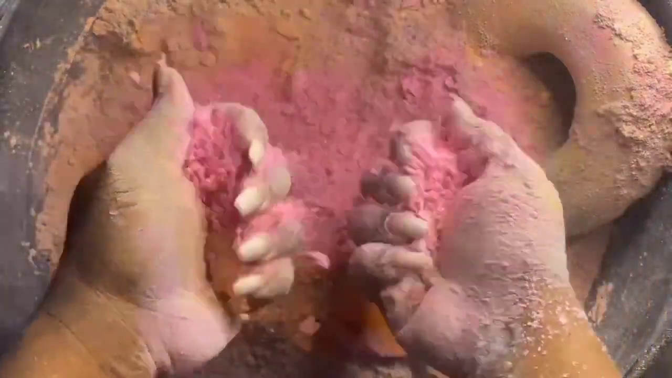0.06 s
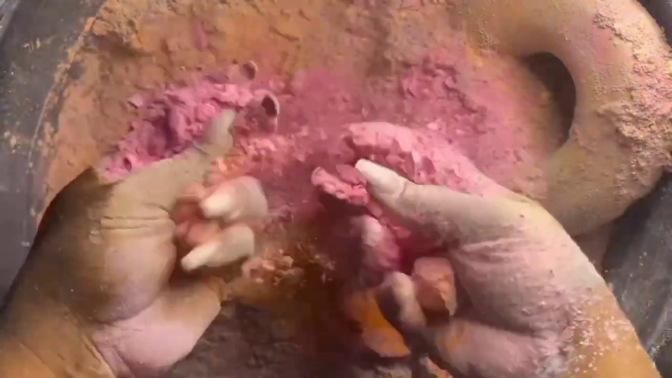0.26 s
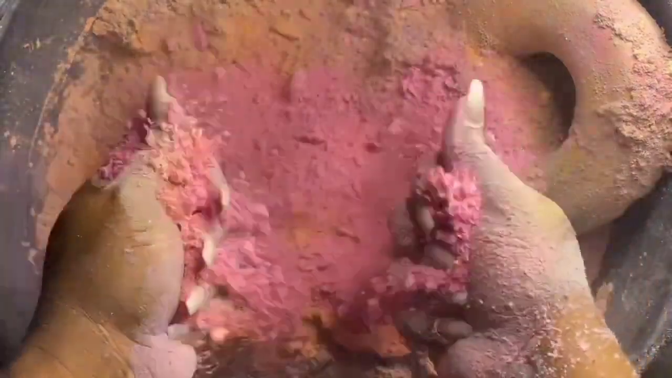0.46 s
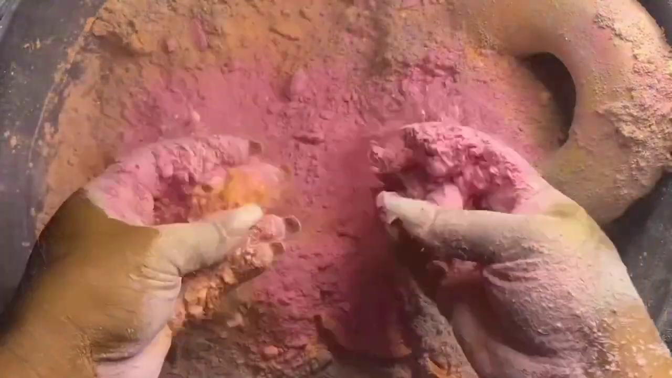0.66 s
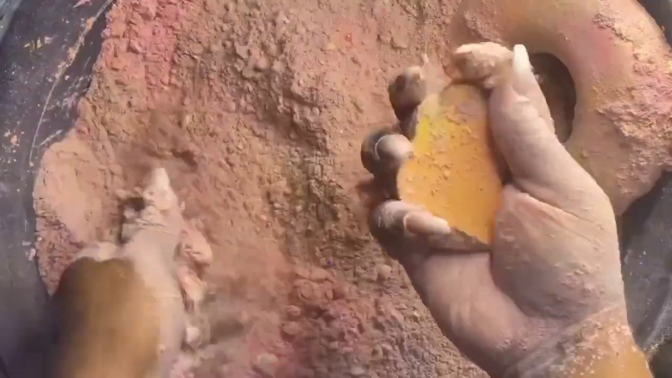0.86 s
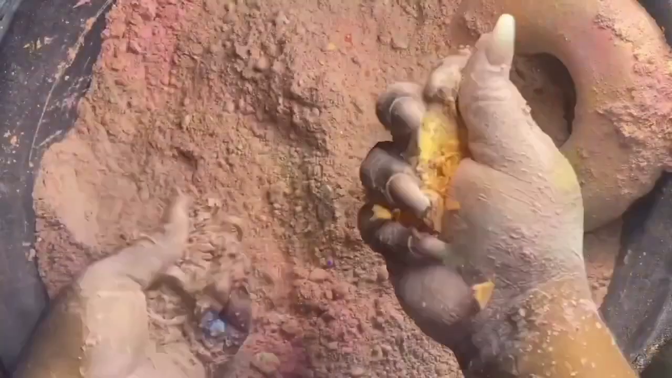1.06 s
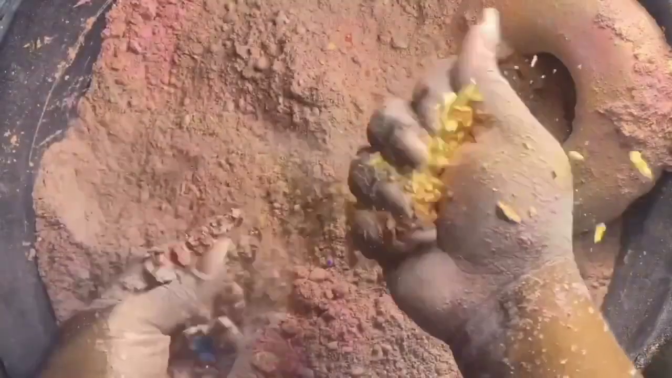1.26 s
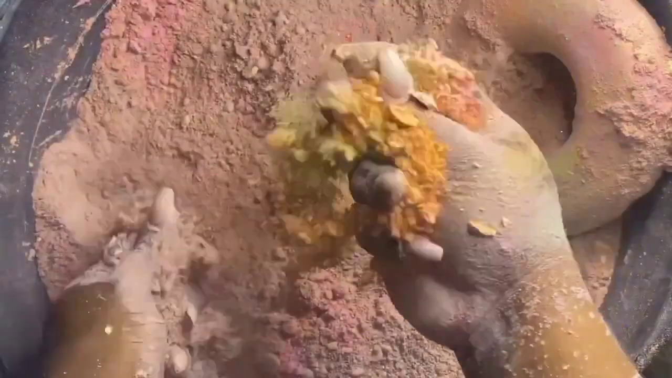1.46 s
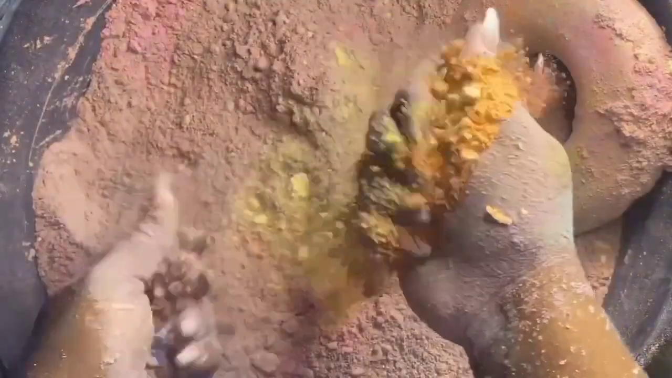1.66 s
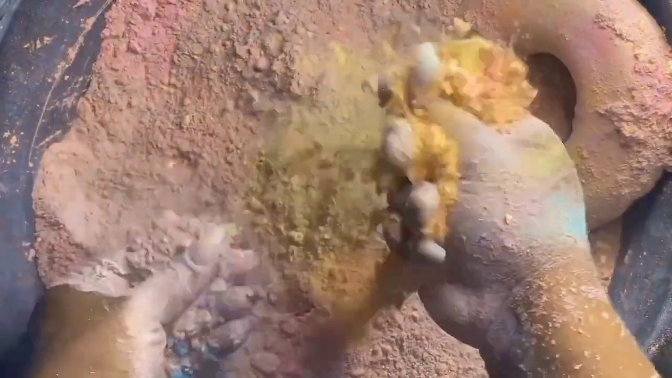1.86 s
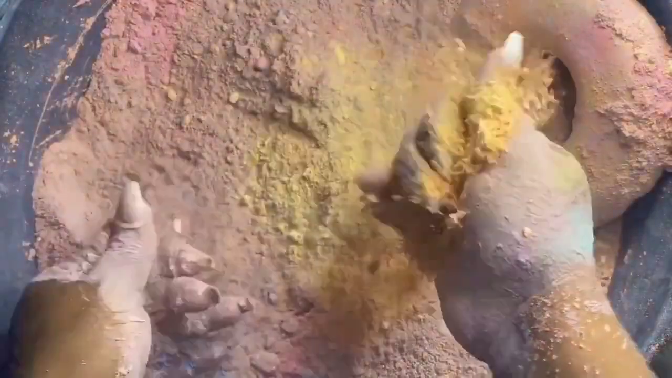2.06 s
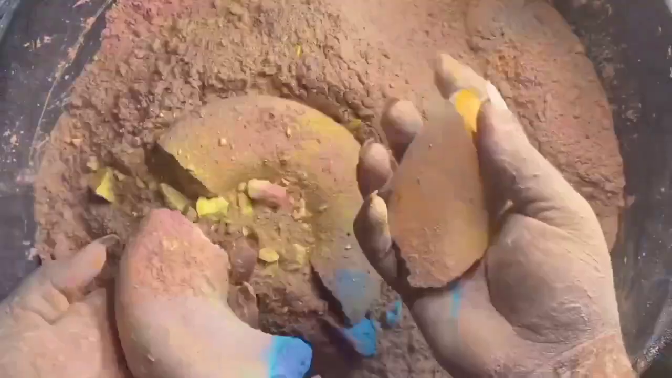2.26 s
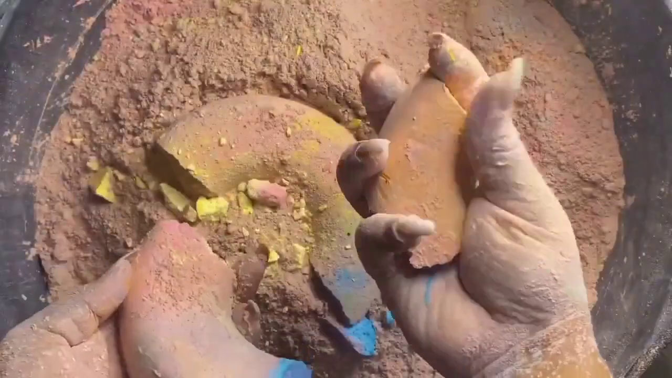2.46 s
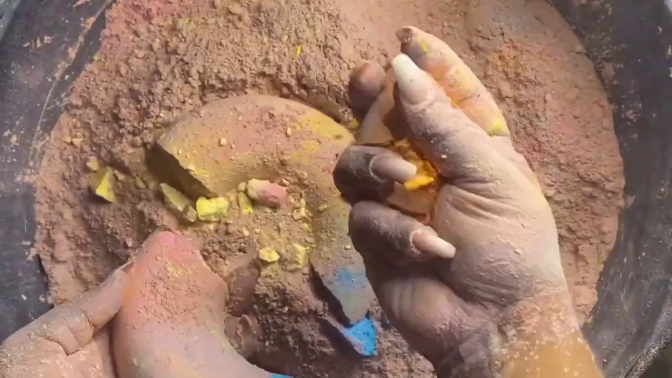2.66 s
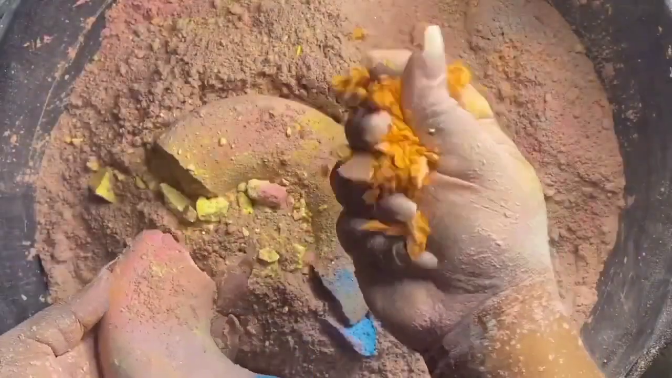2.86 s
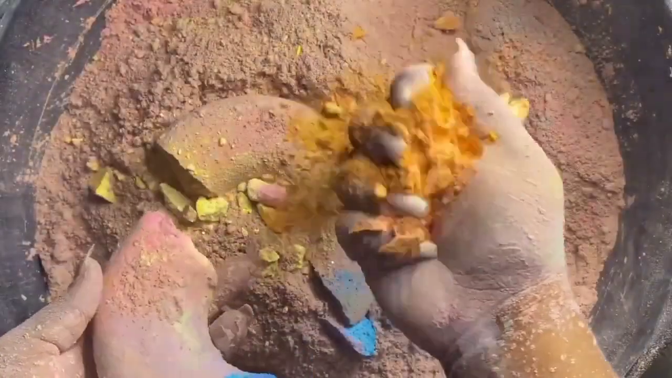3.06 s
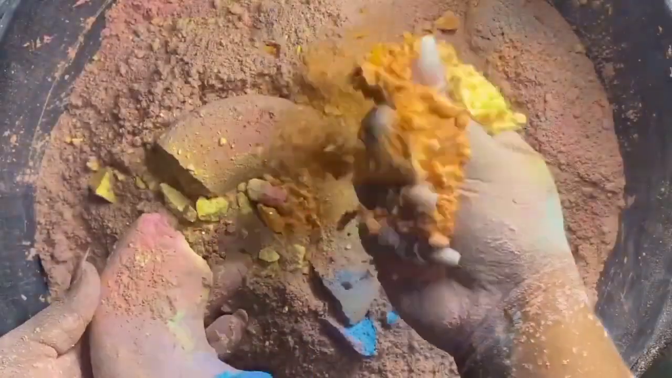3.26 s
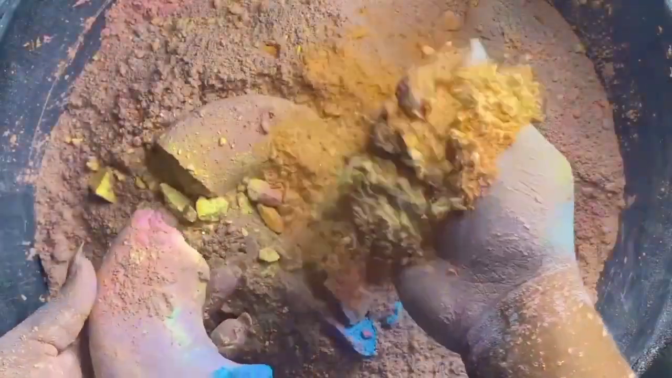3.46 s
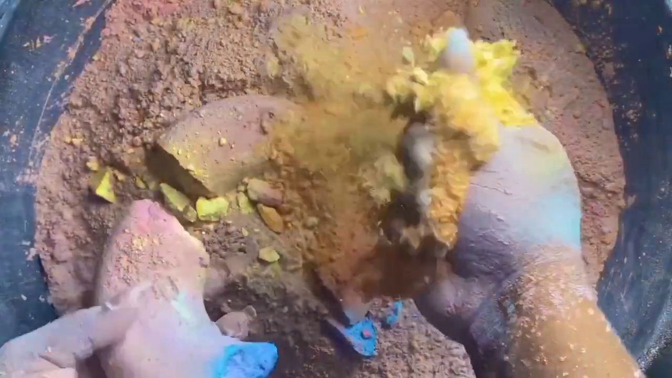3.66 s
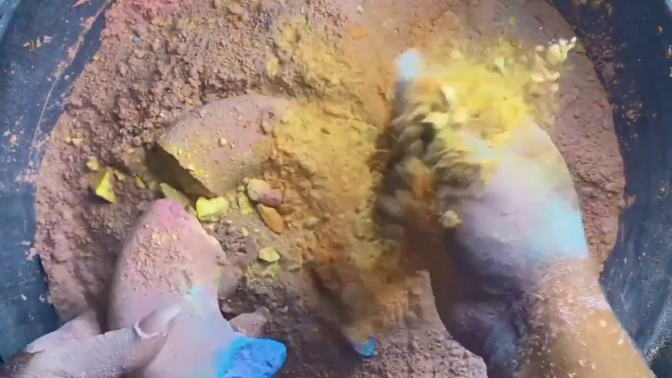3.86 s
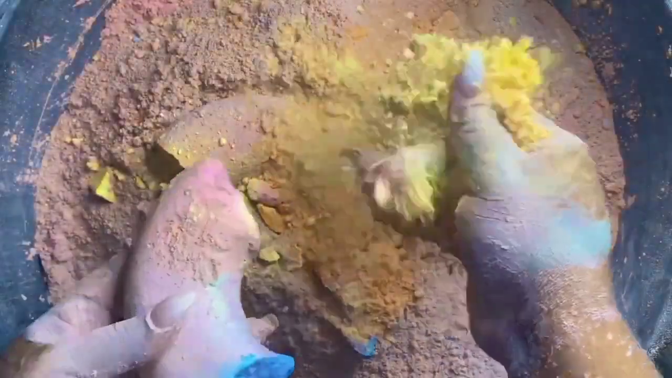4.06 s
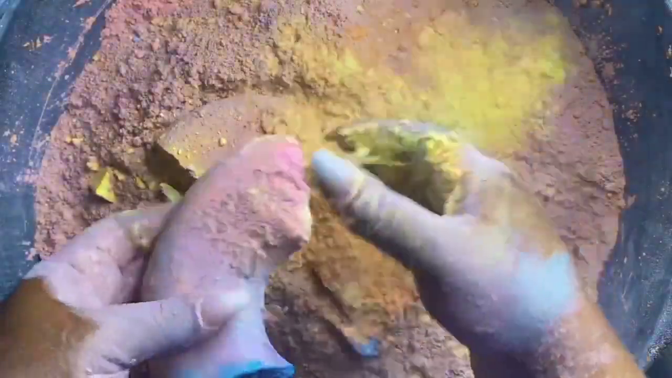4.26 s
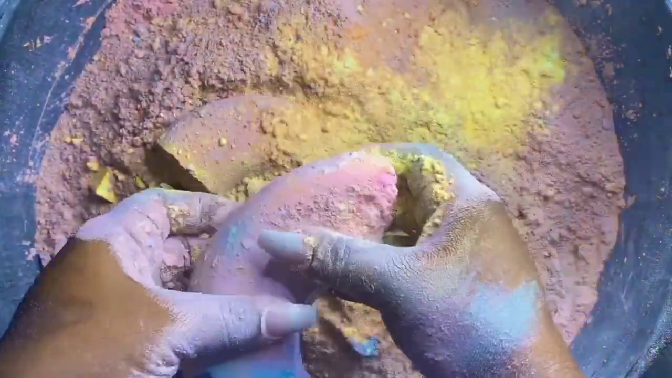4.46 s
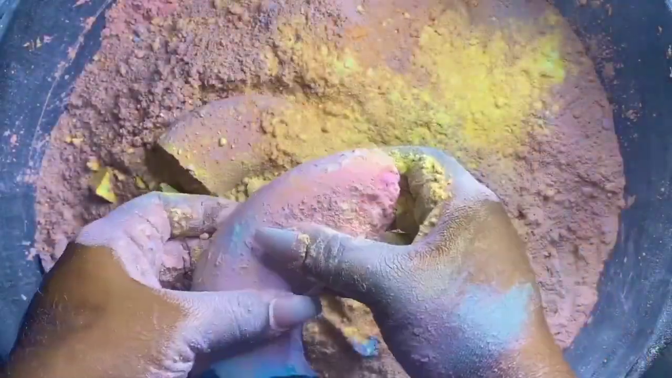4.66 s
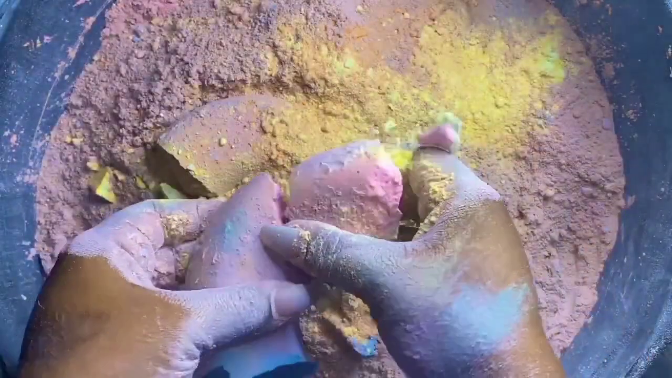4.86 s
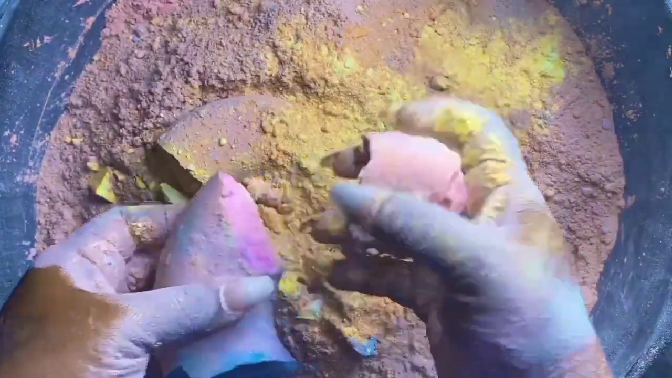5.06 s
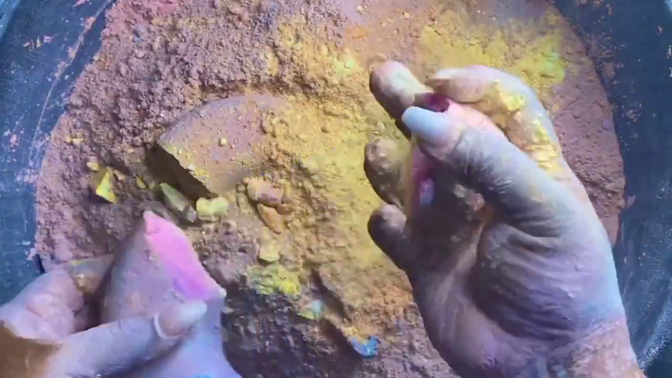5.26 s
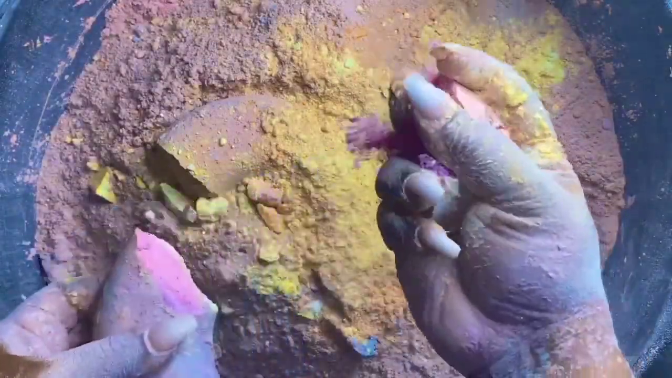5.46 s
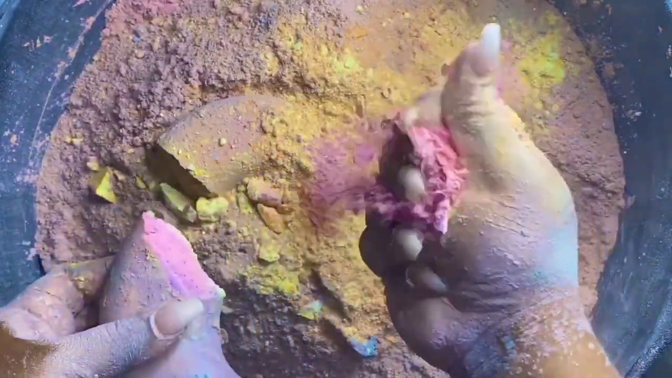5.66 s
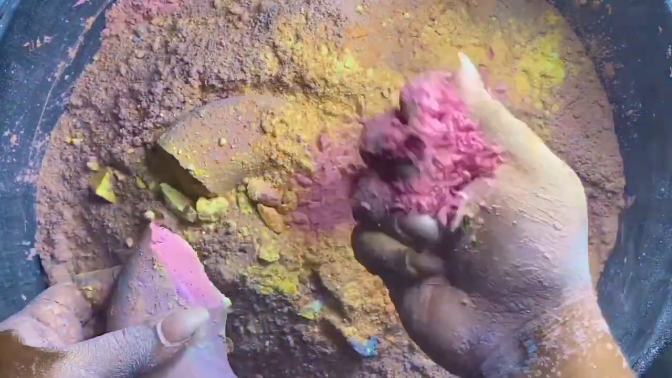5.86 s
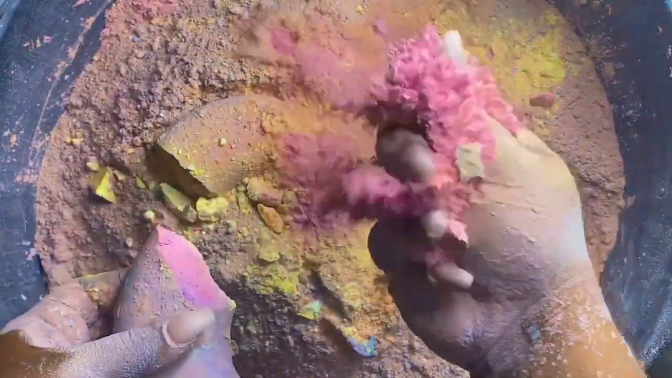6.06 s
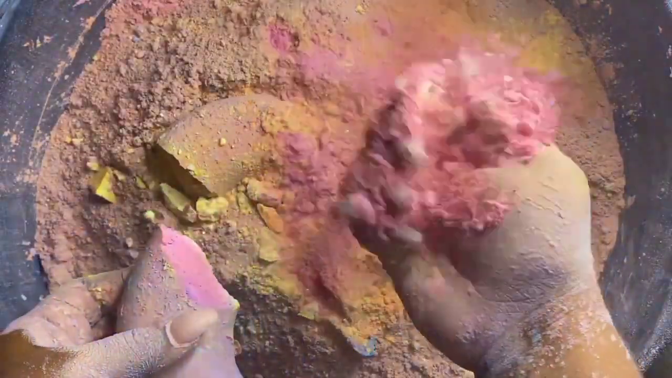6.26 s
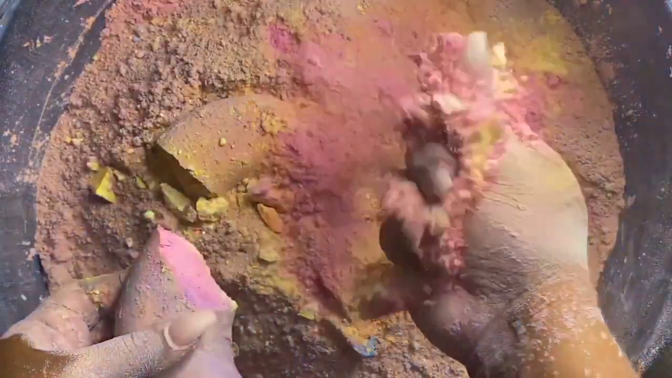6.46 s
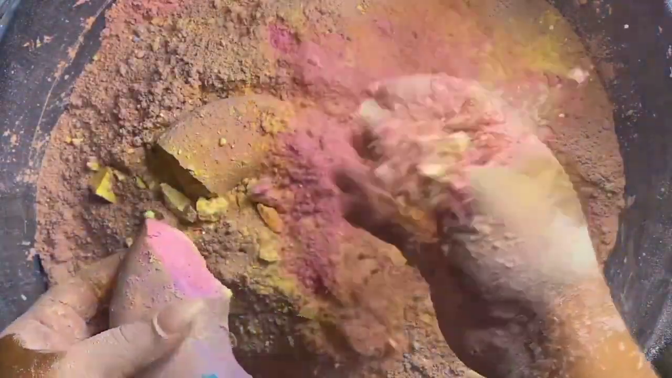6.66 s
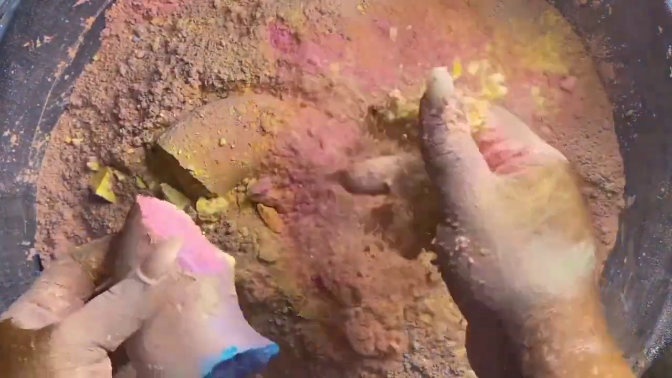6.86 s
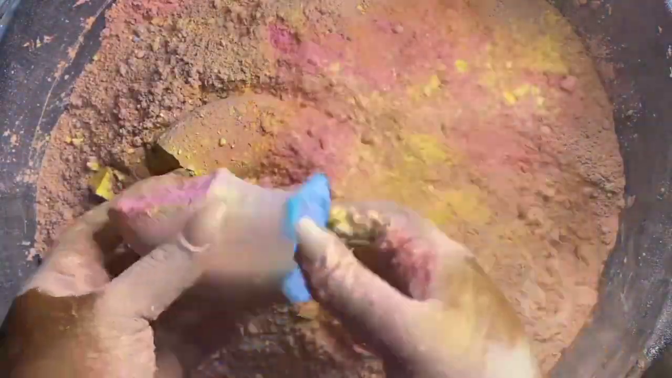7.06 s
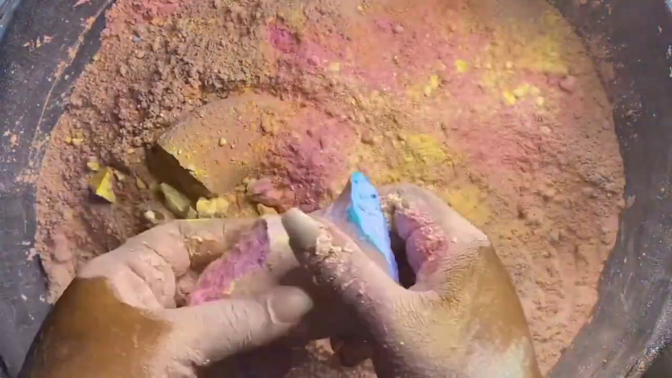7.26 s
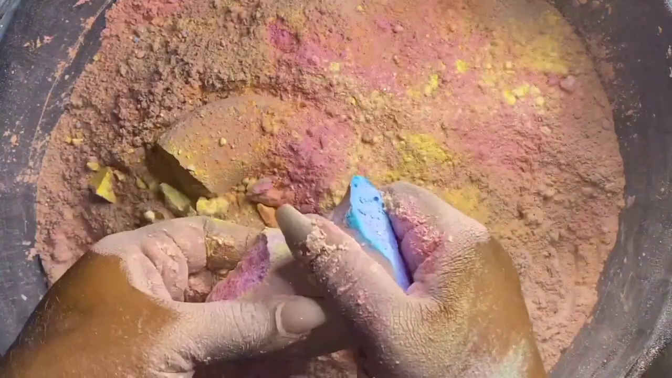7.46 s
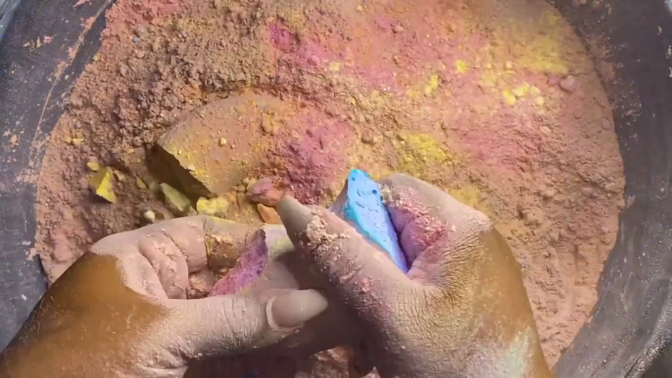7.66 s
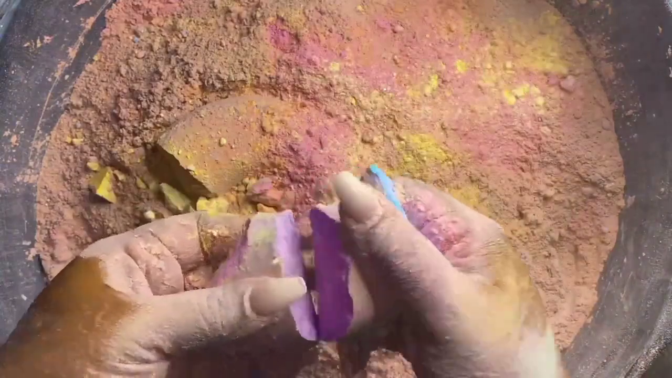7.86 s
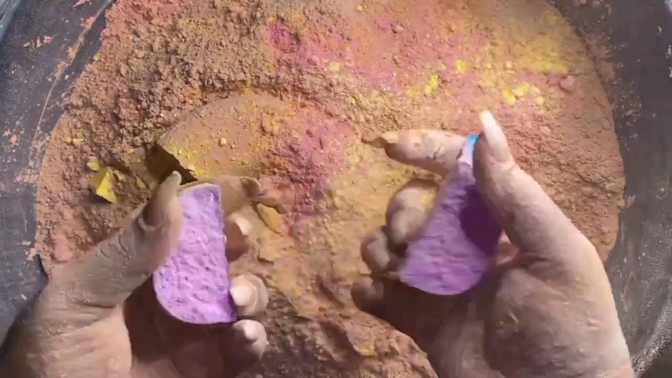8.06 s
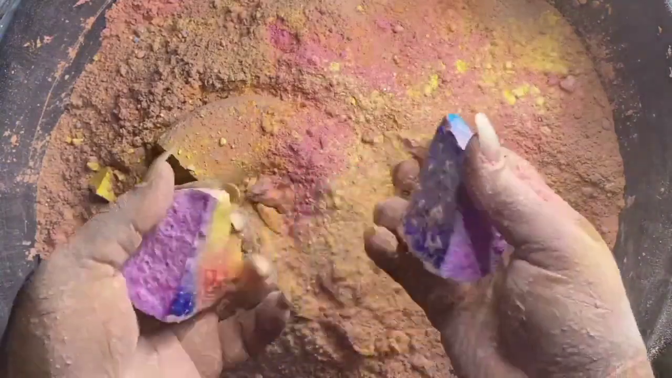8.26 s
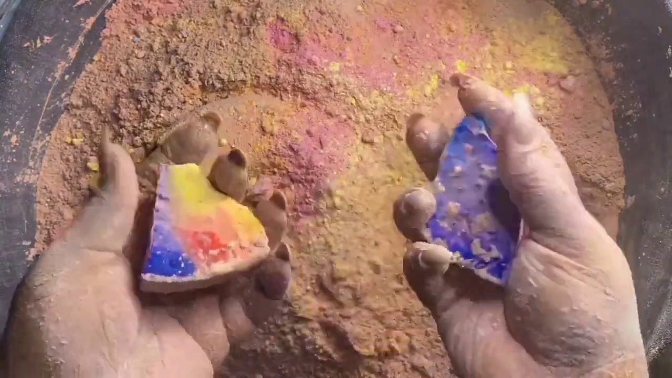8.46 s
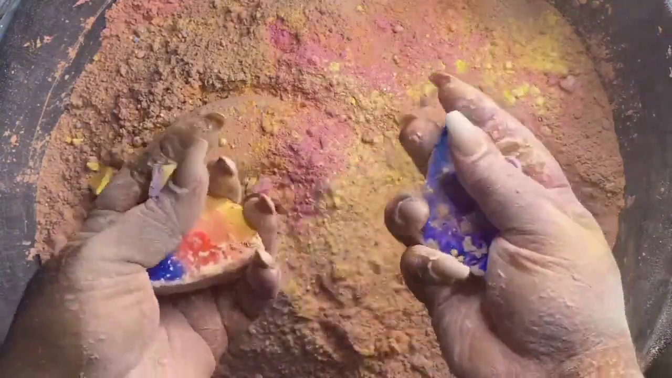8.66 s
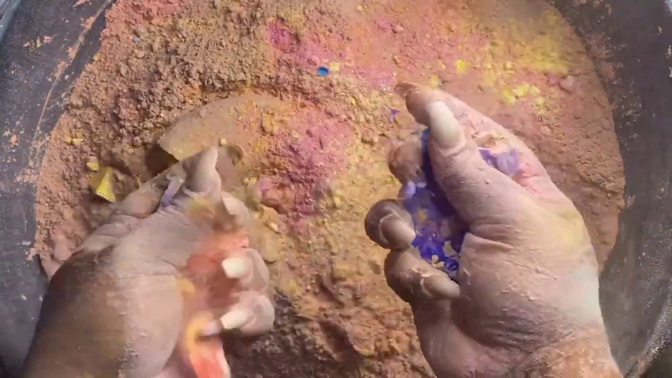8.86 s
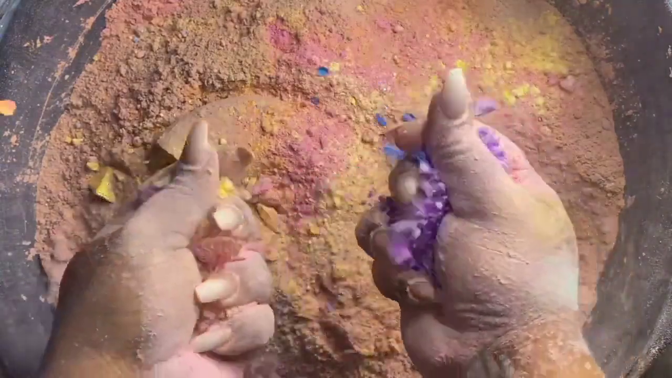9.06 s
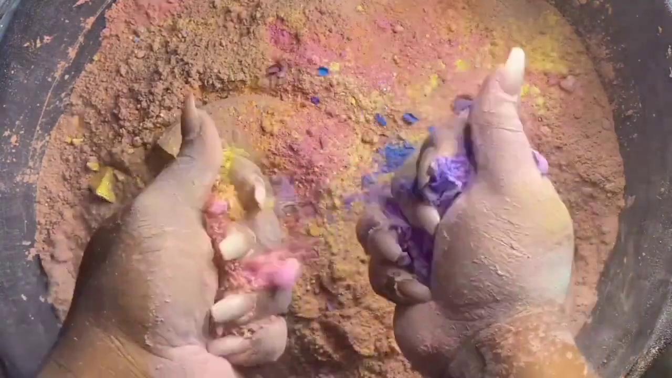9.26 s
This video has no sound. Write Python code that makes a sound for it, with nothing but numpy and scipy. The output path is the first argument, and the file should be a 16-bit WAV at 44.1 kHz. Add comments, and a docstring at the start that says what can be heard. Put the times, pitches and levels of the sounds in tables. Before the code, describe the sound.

Hands crush dry chalk lumps over a bowl, with crackling crumbs, sharp snaps and soft powdery rubbing above a low machine hum.

```python
"""Hands crush dry chalk blocks over a bowl, close to a microphone, in a room where a machine hums.
Lumps snap as spiky bursts with a dull knock; crumbs crackle as thousands of tiny damped sines.
Rubbed chalk and sifting powder are shaped noise that follows the effort of the hands.
The table under the microphone shakes in low noise and deep, fading tones when the hands press.
Behind it, slow-wavering tones and narrow bands of noise make the hum."""
import sys
import numpy as np
from scipy import signal
from scipy.fft import rfft, irfft, next_fast_len
from scipy.io import wavfile
from scipy.ndimage import uniform_filter1d, map_coordinates

SR = 44100
rng = np.random.default_rng(int(sys.argv[2]) if len(sys.argv) > 2 else 0)


def wrap_up_sound(samples):
    """Save the sound to the file named by the first command line argument, as 16-bit audio."""
    columns = np.atleast_2d(samples).T
    # keep every value between -1 and 1, then stretch to whole-number steps
    tamed = np.clip(columns, -1, 1)
    steps = np.round(tamed * 32767).astype(np.int16)
    wavfile.write(sys.argv[1], SR, steps)


N = 410571  # length in samples

# Fuzzy bands of the motor: pitch_hz, width_hz, relative level_db
MOTOR_BANDS = [(32.8, 5.1, 1), (48.9, 9.3, -6.5), (73.3, 5.7, -1.5), (111.5, 4.9, -1.5),
               (126.4, 10.5, -4.5), (185.8, 7.1, -5), (219.5, 3.9, -6.5), (282.4, 8.9, -10),
               (371.9, 6.4, -18.5), (520, 140, -24)]
# Steady tones of the motor, before a shared boost: pitch_hz, level_db
MOTOR_TONES = [(150.7, -47.5), (300.3, -60.5), (372, -69)]
# Colour of the broad room noise: pitch_hz, relative level_db per Hz
ROOM_COLOUR = [(40, -5.5), (100, -16.5), (300, -17), (600, -32.5), (900, -35.5), (1500, -59), (5000, -57),
               (10500, -71), (15800, -72)]
# Shudder of the table over time: time_s, level_db
SHUDDER_LEVEL = [(0.0, -28.5), (0.6, -39.5), (3.42, -40), (8.79, -47.5), (9.08, -49.5), (9.31, -65)]
# Slow sway of the table over time: time_s, level_db
SWAY_LEVEL = [(0, -29.5), (1.3, -38.5), (1.66, -25.5), (2.2, -34), (2.87, -39), (3.12, -28.5), (3.6, -34.5),
              (5.5, -36.5), (5.8, -28), (6.0, -38), (9.31, -41.5)]
# Colour of the shudder: pitch_hz, relative level_db per Hz
SHUDDER_COLOUR = [(14, -10), (22, 23.5), (30, 11.5), (42, 16.5), (60, -47)]
# Colour of the slow sway: pitch_hz, relative level_db per Hz
SWAY_COLOUR = [(1.5, 6), (4, 7.5), (12, 7), (20, -23), (40, -58.5)]
# Hard presses that make the table ring: start_s, level_db before fading in and out, pitch_hz
HARD_PRESSES = [(0.041, -19, 27), (0.417, -24.5, 27.3), (1.644, -20, 25.3), (3.08, -38, 30.5),
                (5.7, -26.5, 39.5), (6.3, -31, 32.2), (8.864, -30.5, 61.5), (9.023, -16, 31.9)]
# Breaks of the chalk: start_s, peak level_db, pitch_hz, knock_db over that peak, rattle's 60 dB fade_ms
BREAKS = [(0.03, -18, 1300, -8, 5.5), (0.131, -26.5, 2890, -19, 4.6), (0.2017, -28, 2980, -13, 4),
          (0.252, -26, 5030, -22, 2.9), (0.2807, -32, 2480, -22, 18), (0.482, -35, 1990, -22, 11),
          (0.501, -29, 1270, -6, 22), (0.526, -25.5, 1630, 3, 5.8), (0.576, -31, 2760, -22, 5),
          (0.7226, -29.5, 1160, 1, 20), (0.7871, -34.5, 2210, 8, 8), (0.8997, -29, 2100, -3, 17),
          (1.1261, -27, 1900, 2, 37), (1.1559, -27, 3330, -16, 7.8), (1.34, -27, 4200, -7, 19),
          (1.3542, -31.5, 1570, 0, 17), (1.392, -29.5, 1330, -3, 6.8), (1.583, -30, 3600, -22, 7),
          (1.6122, -29, 2070, 4.5, 30), (1.65, -25, 2000, 0, 12), (1.8443, -21, 1610, -5, 4.8),
          (2.017, -29, 1900, -25, 19), (2.105, -25.5, 2170, -4, 5.7), (2.1943, -33, 1520, -1, 37),
          (2.447, -32, 2870, -5, 6.7), (2.592, -25, 4280, -15, 15), (2.6419, -32, 3950, 4.5, 21),
          (2.848, -24, 4400, -24, 15), (2.8569, -25, 2310, -14, 2.2), (2.8933, -31, 1830, 1.5, 26),
          (2.906, -28, 4350, -20, 12), (2.9383, -31.5, 1880, 1.5, 9.2), (2.9658, -21.5, 6200, -19, 15),
          (3.03, -30, 2670, -22, 3.5), (3.0523, -34.5, 2200, 9.5, 6.1), (3.0655, -30, 2000, -19, 23),
          (3.1089, -28, 3870, -1, 14), (3.3436, -28, 6090, -24, 11), (3.508, -22, 2580, -25, 4.2),
          (3.5294, -27.5, 2640, -4, 2.4), (3.5895, -31, 3090, -22, 2), (3.659, -36, 1980, 1, 9),
          (3.882, -25, 3050, -22, 1.7), (3.949, -30, 2350, 0, 16), (4.2213, -26.5, 3940, -22, 3.9),
          (4.368, -28.5, 7250, -26, 12), (4.7528, -42, 1940, -17, 16), (4.783, -36, 2490, 16.5, 16),
          (4.9527, -27.5, 2850, -5.5, 11.5), (4.9726, -29.5, 2350, -8, 7), (4.982, -38, 5500, -15, 5),
          (5.019, -22.5, 2700, -16, 3), (5.0306, -35, 2200, -12, 8), (5.1572, -38.5, 2700, -17, 8.5),
          (5.397, -28.5, 4100, -4, 50), (5.453, -32, 1600, 6.5, 18), (5.7263, -31, 1840, -2.5, 49),
          (5.9127, -32, 2620, -22, 10), (5.998, -23.5, 3700, -25, 3.5), (6.0628, -19, 2100, -9.5, 5.4),
          (6.143, -35.5, 3260, 5, 24), (6.1617, -30, 2260, -24, 3), (6.3314, -25.5, 3870, -14, 7.6),
          (6.3967, -27, 3530, -13, 6.1), (6.5448, -25, 2230, -15, 4.1), (6.6846, -27.5, 2730, -6, 6.9),
          (6.7116, -27, 3780, -22, 3.4), (7.005, -34, 1870, 1, 1.6), (7.731, -21, 1300, 9, 14),
          (7.7351, -22, 5650, -11, 11), (7.8071, -24, 5750, -12, 17.5), (8.169, -32.5, 2900, -12, 4.4),
          (8.356, -40, 1620, -19, 6), (8.664, -38, 2670, -9, 4.5), (8.8124, -30.5, 3670, -5, 36),
          (8.848, -33, 3530, -16, 5), (8.861, -25, 2140, -8, 32), (8.8652, -19.5, 1320, 0.5, 14),
          (8.9223, -42, 2000, -3, 4.2), (9.0222, -18.5, 2560, -6, 14), (9.0273, -18, 950, 4.5, 40),
          (9.044, -24, 4300, 2, 27), (9.057, -24, 900, 0.5, 20), (9.091, -25.5, 1540, -2.5, 5),
          (9.0947, -22.5, 2060, 0.5, 14), (9.117, -32, 4160, -15, 12), (9.124, -32, 2100, -12, 12),
          (9.158, -35.5, 1200, 5, 12), (9.237, -35.5, 1190, 8.5, 16), (9.259, -16, 1800, -6, 5.1)]
# Steady kneading over time: time_s, rub level_db, crumbling_db over the rub
KNEADING_LEVEL = [(0.0, -50, -9), (0.6, -51, 3), (1.2, -67, -6), (1.75, -55, 1.5), (2.15, -59, 4),
                  (2.22, -59, -20), (2.75, -61, 6), (3.6, -50.5, -1), (4.2, -52.5, -6.5), (4.3, -57.5, -6),
                  (4.65, -71, -4), (5.4, -58, -7), (5.55, -53.5, 3), (6.4, -53.5, 2), (7.4, -75.5, 6.5),
                  (7.55, -85.5, 15.5), (8.35, -45.5, -22.5), (8.75, -68, -1.5), (8.9, -51.5, -2.5),
                  (9.31, -55.5, 1.5)]
# Squeezes and finger strokes: middle_s, length_s, rub level_db, crumbling_db and powder_db over the rub
STROKES = [(0.006, 0.27, -45, 7.5, -8), (0.337, 0.22, -52.5, 7, -5), (0.527, 0.13, -45.5, 3, -8),
           (0.688, 0.14, -49, -19, -4), (0.763, 0.12, -50.5, 7.5, -6), (0.878, 0.13, -50, 2, -5),
           (1.005, 0.074, -47, 4.5, -7), (1.115, 0.12, -46, -1.5, -5), (1.425, 0.43, -49.5, 1, -8),
           (1.558, 0.14, -45.5, -4.5, -7), (1.673, 0.19, -46.5, 0, -12), (1.923, 0.13, -43.5, -3, -2),
           (2.023, 0.062, -43.5, -2.5, -7), (2.109, 0.13, -46, 0.5, -1), (2.27, 0.069, -55, -18, -10),
           (2.476, 0.22, -52, -11, -9), (2.657, 0.04, -43.5, 1, -8), (2.822, 0.13, -51, 2, -10),
           (2.957, 0.097, -48.5, -3, -7), (3.078, 0.16, -46, 0, -15), (3.335, 0.034, -45, -19, -6),
           (3.48, 0.24, -48, -2, -18), (3.6225, 0.007, -40.5, -1.5, 2.5), (3.824, 0.047, -40.5, -7, -4),
           (4.017, 0.011, -46, -18, 3), (4.207, 0.14, -55, 5, -11), (4.512, 0.023, -54.5, -4, -8),
           (4.799, 0.037, -39, -11, -8), (5.013, 0.21, -58.5, -7, -11), (5.212, 0.027, -44.5, -10, -9),
           (5.242, 0.028, -45, -13, -1), (5.324, 0.039, -51, -13, -11), (5.399, 0.037, -49.5, 1.5, -16),
           (5.458, 0.022, -46.5, 2, -13), (5.662, 0.046, -51.5, 3.5, 2), (5.765, 0.057, -54, 8, -10),
           (6.185, 0.12, -51.5, 4, -14), (6.276, 0.12, -50, 2, -2), (6.414, 0.057, -54.5, 2.5, -3),
           (6.565, 0.2, -48.5, -1, -5), (6.71, 0.072, -55.5, 7, -4), (6.845, 0.11, -51.5, -5.5, -3),
           (6.992, 0.11, -53, 1.5, -10), (7.098, 0.09, -47.5, -12.5, -7), (7.222, 0.08, -52.5, -13.5, -5),
           (7.33, 0.29, -56, -11.5, -5), (7.765, 0.076, -56.5, -3, -1), (7.934, 0.092, -54, -10, -5),
           (8.02, 0.033, -51.5, -23, -1), (8.092, 0.022, -49.5, -20, -6), (8.191, 0.11, -51, -9.5, -3),
           (8.26, 0.05, -50.5, -10, 4), (8.365, 0.065, -44.5, -11.5, -3.5), (8.515, 0.068, -41, -23, -13),
           (8.753, 0.017, -52.5, -4, -8), (8.861, 0.034, -38, 0, -9), (9.027, 0.015, -35, 1, -1),
           (9.003, 0.05, -48, -11, -12), (9.09, 0.17, -49, -1, -8), (9.235, 0.081, -57, 9, -2)]
# Size of the lump in hand, where higher factors mean higher ringing: time_s, pitch_factor
LUMP_SIZE = [(0, 1.07), (5.5, 0.82), (6.9, 1.09), (9.31, 1.06)]
# Ringing of a rubbed whole lump: pitch_hz, width_hz, relative level_db
LUMP_RINGING = [(3500, 900, -10), (5150, 550, 0), (6300, 1200, -5), (7800, 1100, -2.5)]
# Colour of crumbs rolled on skin: pitch_hz, relative level_db per Hz
SKIN_COLOUR = [(2000, -6.5), (3500, -9.5), (5000, -7.5), (8000, -11.5), (10000, -15.5), (13000, -32)]
# Colour of the noise among the crumbs: pitch_hz, relative level_db per Hz
CRUMB_COLOUR = [(250, -11), (500, 25), (1000, 3), (2500, -16), (5000, -6), (9000, -30)]
# Colour of the powder hiss: pitch_hz, relative level_db per Hz
POWDER_COLOUR = [(7000, -20), (9300, -5), (11000, -7), (12800, -1), (14500, 0), (15800, -1)]
# Difference between the channels: pitch_hz, side_db against the shared sound
SIDE_COLOUR = [(4400, -67), (8000, -26), (15000, -8)]

TOP_HZ = 15800  # band limit
GRIP_POWDER_DB = -8.5  # powder against the rub while kneading
STROKE_EDGE = 3  # 2 = bell, more = flat top with steep ends
LONG_BREAK_MS = 8  # fade of the break that other lengths are compared with
SPILL_DB, SPILL_S, SPILL_POWDER_DB = -42, 0.0052, -32  # after such a break: level, fade, powder share
LEAD_IN_DB, LEAD_IN_S = -26, 0.001  # soft lead-in: level, rise time
TREBLE_DB, TREBLE_PER_OCTAVE_DB = -24, 5  # average spit at a 2 kHz break; higher breaks spit more
KNOCK_HZ, KNOCK_HALVES_DB = 679, 24  # knock pitch at 0 dB, rise that halves it
SPIKE = 6  # first slip of a long break against its rattle
RING_BASE_HZ = 2000  # ring width at 2 kHz before shortness broadens it
FRAGMENT_DB, FRAGMENT_S = -13, .006  # splinters: base level under the first slip, mean delay
BOWL_ECHO, BOWL_ECHO_S = .35, .0016  # strength and longest delay of the bowl's echo


def amp(db):
    """Turn decibels into a plain gain."""
    return 10 ** (np.asarray(db) / 20)


def unit(x):
    """Scale a sound to an average (rms) level of one."""
    return x / np.sqrt(np.mean(x ** 2) + 1e-20)


def shape(points):
    """Join (pitch_hz, level_db) points into a gain curve on a log pitch axis."""
    pitch_hz, level_db = np.transpose(points)
    return lambda hz: amp(np.interp(np.log(hz + .1), np.log(pitch_hz), level_db))


def modes(rows):
    """Ringing bodies boost sound near their own pitches, with alternating signs."""
    def response(f):
        total = 0
        for k, (centre, width, db) in enumerate(rows):
            resonance = 1j * f * width / (centre * centre - f * f + 1j * f * width)
            total = total + (-1) ** k * amp(db) * resonance
        return total
    return response


def curves(rows):
    """Draw each column after the time as one value per sample."""
    time_s, *columns = np.transpose(rows)
    return [np.interp(np.arange(N) / SR, time_s, column) for column in columns]


def wobble(rate):
    """Draw a smooth random curve with this many knots a second."""
    knots = rng.standard_normal(int(N * rate / SR) + 4)
    return map_coordinates(knots, [np.arange(N) * rate / SR])


def filtered(x, response):
    """Weigh each pitch in a sound by a response."""
    size = next_fast_len(N + SR)
    spectrum = rfft(x, size) * response(np.fft.rfftfreq(size, 1 / SR))
    return irfft(spectrum, size)[..., :N]


def noise(response):
    """Make coloured noise at unit level."""
    return unit(filtered(rng.standard_normal(N), response))


def fading(x, fade_s):
    """Let every jump die away smoothly."""
    return signal.lfilter([1], [1, -np.exp(-1 / (fade_s * SR))], x)


def grains(count, pitch_hz, octaves, cycles, spread_db):
    """Tiny fractures: damped sines of random pitch and size, most of them small."""
    when, size = rng.random((2, count))
    hz = pitch_hz * 2 ** (octaves * rng.standard_normal(count))
    hz = np.clip(hz, 300, 15500)[:, None]
    k = np.arange(128)
    turn = hz * k / SR
    gain = amp(-spread_db * np.log(size + .003))[:, None]
    envelope = np.exp(-turn / cycles) * (1 - np.exp(-4 * turn)) * (1 - k / 128)
    wave = gain * np.sin(2 * np.pi * turn) * envelope
    places = (when * N).astype(int)[:, None] + k
    return unit(np.bincount(places.ravel(), wave.ravel(), N + 128)[:N])


def patchy(x, depth_db):
    """Random gain in patches of time and pitch, as the touching spot wanders."""
    z = signal.stft(x, nperseg=256)[2]
    field = uniform_filter1d(rng.standard_normal(z.shape), size=4, axis=0)  # smooth over pitch
    field = uniform_filter1d(field, size=16, axis=1)  # smooth over time
    return unit(signal.istft(z * amp(depth_db * unit(field)), nperseg=256)[1][:N])


def room():
    """A motor drones in wavering tones and narrow bands over the broad noise of the room."""
    t = np.arange(N) / SR
    drone = np.zeros(N)
    for hz, db in MOTOR_TONES:
        level = amp(db + 5.0 + 1.4 * wobble(6.5))
        drone += level * np.sin(2 * np.pi * hz * t + 0.65 * wobble(3))
    return drone + amp(-41) * noise(modes(MOTOR_BANDS)) + amp(-44.0) * noise(shape(ROOM_COLOUR))


def table():
    """The table shudders in low noise, sways more slowly and rings when a hand presses hard."""
    rings, t = np.zeros(N + SR), np.arange(SR // 2) / SR
    for start_s, db, hz in HARD_PRESSES:
        level = amp(db - 60 * t / 0.53) * (1 - np.exp(-t / 0.0061))
        rings[round(start_s * SR):][:len(t)] += level * np.sin(2 * np.pi * hz * t)
    shudder = amp(curves(SHUDDER_LEVEL)[0]) * noise(shape(SHUDDER_COLOUR))
    sway = amp(curves(SWAY_LEVEL)[0]) * noise(shape(SWAY_COLOUR))
    return rings[:N] + shudder + sway


def effort():
    """Gains of crumbling, rub and powder: the power of kneading, strokes, lead-ins and debris adds up."""
    t = np.arange(N) / SR
    rub_db, crumble_db = curves(KNEADING_LEVEL)
    power = amp(rub_db + np.array([crumble_db, 0 * t, 0 * t + GRIP_POWDER_DB])) ** 2
    for middle_s, length, db, crumble_db, powder_db in STROKES:
        near = slice(max(round((middle_s - length) * SR), 0), round((middle_s + length) * SR))
        swell = np.exp(-2 * np.abs(2 * (t[near] - middle_s) / length) ** STROKE_EDGE)
        power[:, near] += amp(db + np.array([[crumble_db], [0], [powder_db]])) ** 2 * swell
    breaks = np.zeros(N)
    for start_s, db, *_, fade_ms in BREAKS:
        breaks[round(start_s * SR)] = amp(db) ** 2 * fade_ms / LONG_BREAK_MS  # long breaks shed more
    spill = amp(SPILL_DB) ** 2 * fading(breaks, SPILL_S)
    lead_in = amp(LEAD_IN_DB) ** 2 * fading(breaks[::-1], LEAD_IN_S)[::-1]  # swells just ahead of each break
    return np.sqrt(power + amp([[0], [0], [SPILL_POWDER_DB]]) ** 2 * (spill + lead_in))


def slips(count, fade_s, spread_db):
    """Sudden give of the grip: jumps at random moments that fade away."""
    when, size = rng.random((2, count))
    jumps = np.bincount((when * N).astype(int), amp(-spread_db * np.log(size + .015)), N)
    return unit(fading(jumps, fade_s))


def rubbing(whole):
    """A whole lump rings in its modes, higher when small; loose crumbs only rasp."""
    small = np.clip((curves(LUMP_SIZE)[0] - .88) / .14, 0, 1)
    low = noise(lambda hz: modes(LUMP_RINGING)(hz / .88))
    high = noise(lambda hz: modes(LUMP_RINGING)(hz / 1.02))
    ring = np.sqrt(1 - small) * low + np.sqrt(small) * high
    rolling = grains(count=9000, pitch_hz=5000, octaves=0.6, cycles=1.5, spread_db=3.8)
    rasp = unit(noise(shape(SKIN_COLOUR)) + rolling)
    return patchy(np.sqrt(whole) * ring + np.sqrt(1 - whole) * rasp, depth_db=2.5)


def crumbling():
    """Squeezed lumps give way in clumps of fractures; skin rubs on chalk; powder hisses."""
    crumbly, rubbed, powdery = effort()
    give = slips(count=1100, fade_s=0.0095, spread_db=3.0)  # heard in every layer
    stroke = wobble(25)
    ticks = grains(count=5000, pitch_hz=2400, octaves=.7, cycles=.8, spread_db=5.0)
    chips = grains(count=4000, pitch_hz=1800, octaves=1.0, cycles=2.0, spread_db=3.0)
    crumbs = ticks + chips + amp(-1.5) * noise(shape(CRUMB_COLOUR))
    crumbs = unit(crumbs * (1.2 + give) * amp(1.03 * stroke))
    # little crumbling against the rub: the lump is still in one piece
    whole = np.clip(2 * np.log10(rubbed / crumbly) - .15, 0, 1)
    rub_swing = amp((1.8 - .8 * whole) * stroke)
    rub = unit(rubbing(whole) * rub_swing * (.8 + (.45 - .3 * whole) * give))
    powder = patchy(noise(shape(POWDER_COLOUR)), depth_db=2.5)
    powder = unit(powder * amp(2.6 * stroke) * (1 + .25 * give))
    return crumbly * crumbs + rubbed * rub + powdery * powder


def cracks():
    """Each break: a spike, a ringing rattle, late splinters, a spit of treble and the lump's knock."""
    out, t = np.zeros(N + SR), np.arange(2048) / SR
    hz = np.fft.rfftfreq(4096, 1 / SR)
    for start_s, db, pitch_hz, knock_db, fade_ms in BREAKS:
        fade_s = max(fade_ms, 1) / 1000
        short = LONG_BREAK_MS / (1000 * fade_s)  # shorter breaks are spikier and broader
        spike = SPIKE * np.sqrt(short)
        rattle_level = amp(1.7 * rng.standard_normal(len(t)) - 60 * t / fade_s)
        burst = rng.standard_normal(len(t)) * rattle_level * (1 - np.exp(-t / (0.0045 * fade_s)))
        burst[8] += spike
        late, size = rng.exponential(size=(2, 5))
        places = 8 + np.minimum(late * FRAGMENT_S * SR, 2000).astype(int)
        burst[places] += spike * amp(FRAGMENT_DB - 3 * late) * np.sqrt(size)
        width_hz = RING_BASE_HZ * (pitch_hz / 2000) ** .4 * (1 + .35 * short)
        ring = modes([(pitch_hz, width_hz, 0)])(hz) ** 3
        body = amp(-9.0) * modes([(2800, 4000, 0)])(hz) ** 3
        treble_db = TREBLE_DB + TREBLE_PER_OCTAVE_DB * np.log2(pitch_hz / 2000)
        treble_db += 3 * rng.standard_normal()
        spit = amp(treble_db) * modes([(12500, 8000, 0)])(hz) ** 2
        # the bowl throws the break back upside down after a tiny random delay
        bowl = 1 - BOWL_ECHO * np.exp(-2j * np.pi * hz * BOWL_ECHO_S * rng.random())
        crack = irfft(rfft(burst, 4096) * (ring + body + spit) * bowl)[:len(t)]
        # a louder knock is also deeper, like a bigger lump
        turns = KNOCK_HZ * .5 ** (knock_db / KNOCK_HALVES_DB) * t
        knock = -np.sin(2 * np.pi * turns) * np.exp(-((turns - .75) / .5) ** 2)
        both = crack / np.abs(crack).max() + amp(knock_db) * knock
        out[round(start_s * SR):][:len(t)] += amp(db) * both
    return out[:N]


def scene():
    """Almost mono: mainly the treble differs a little between the channels."""
    mid = room() + table() + crumbling() + cracks()
    scatter = rng.standard_normal(1500) * np.exp(-np.arange(1500) / 250)
    scattered = signal.fftconvolve(mid, scatter / np.linalg.norm(scatter))[:N]
    side = filtered(scattered, shape(SIDE_COLOUR))
    return mid + np.array([side, -side])


def record(dry):
    """Nothing is kept above the band limit."""
    return filtered(dry, lambda hz: hz < TOP_HZ)


dry = scene()
out = record(dry)
wrap_up_sound(out)
```